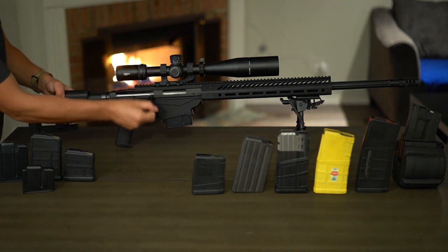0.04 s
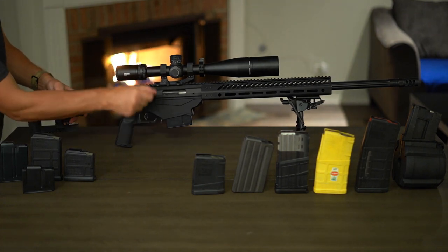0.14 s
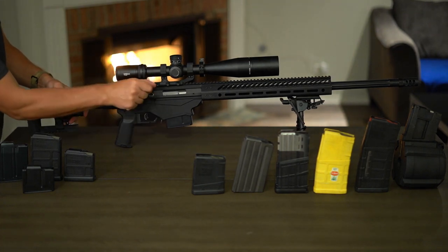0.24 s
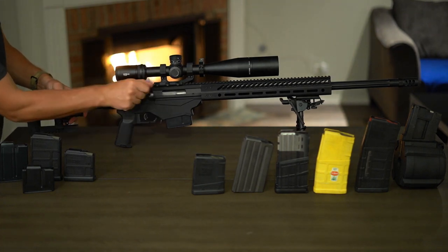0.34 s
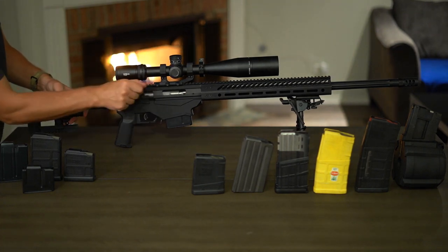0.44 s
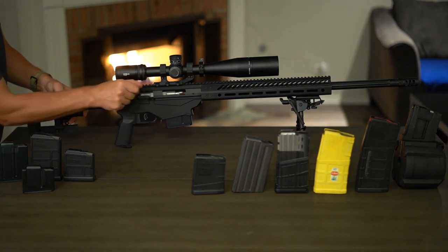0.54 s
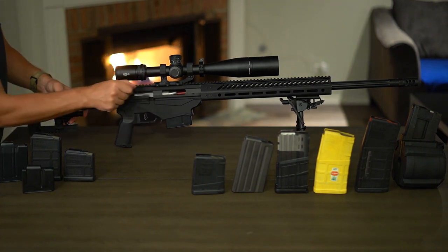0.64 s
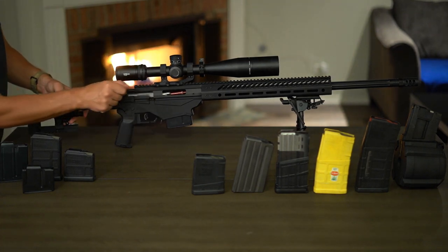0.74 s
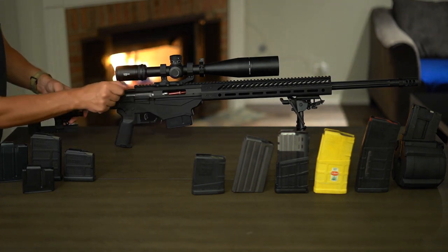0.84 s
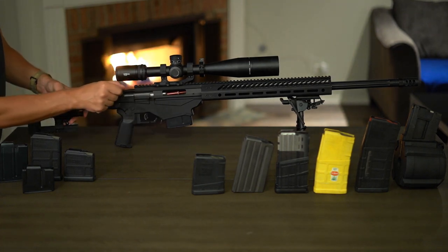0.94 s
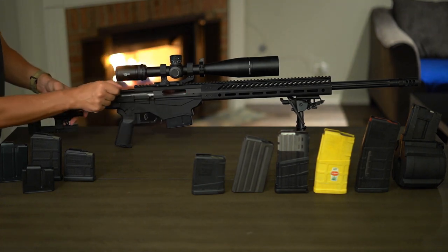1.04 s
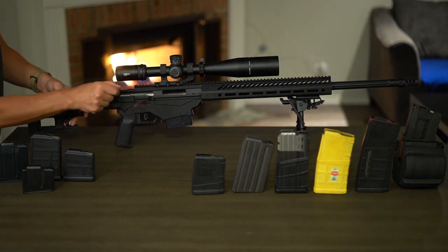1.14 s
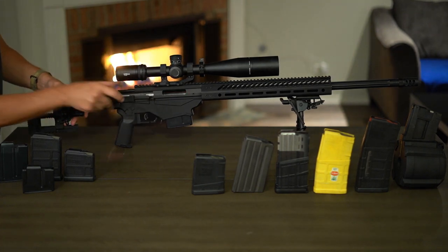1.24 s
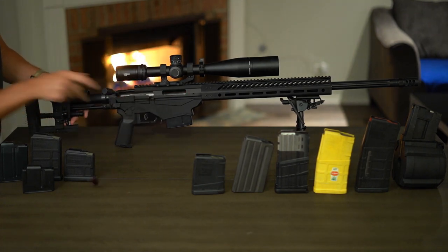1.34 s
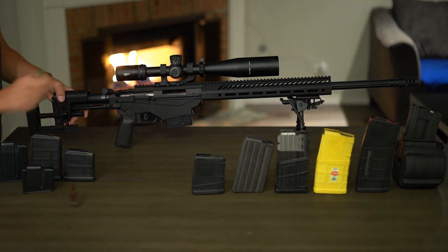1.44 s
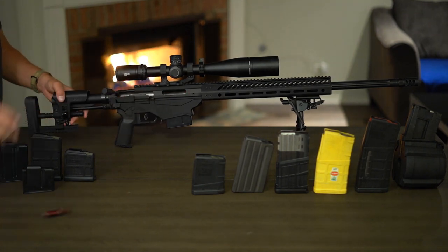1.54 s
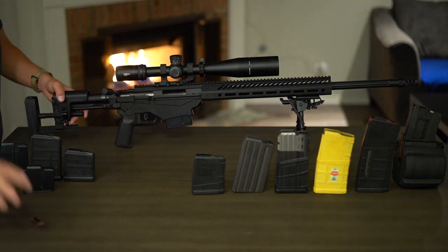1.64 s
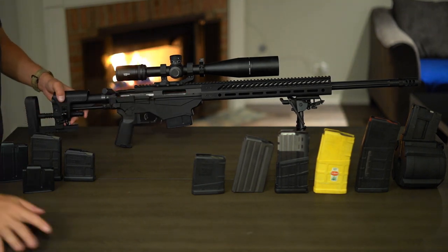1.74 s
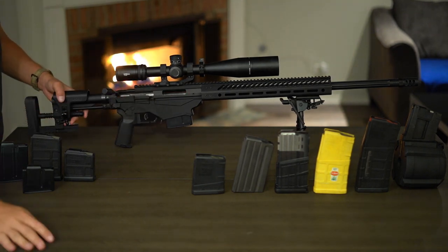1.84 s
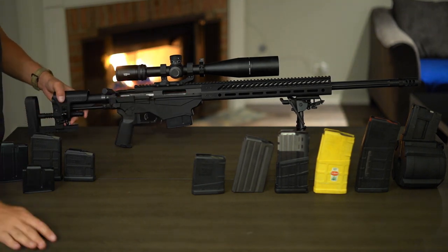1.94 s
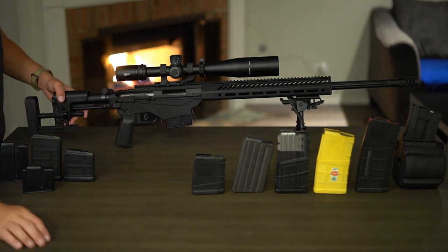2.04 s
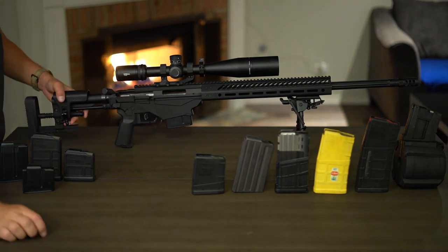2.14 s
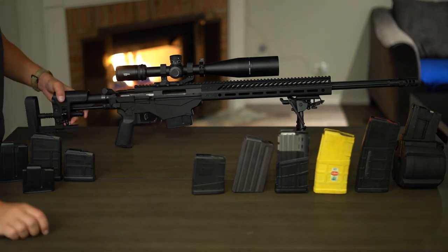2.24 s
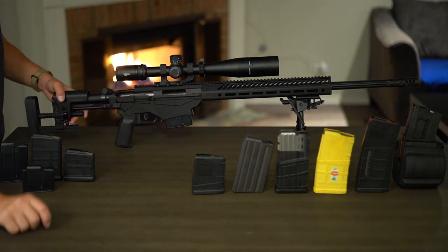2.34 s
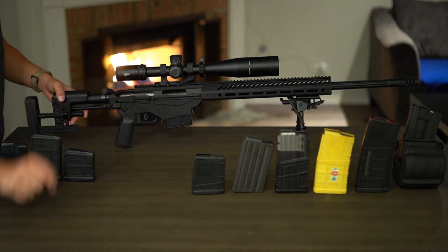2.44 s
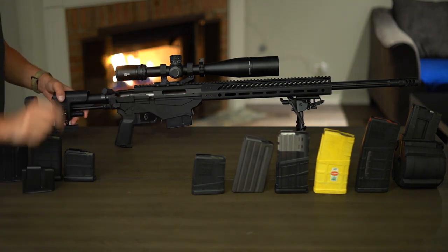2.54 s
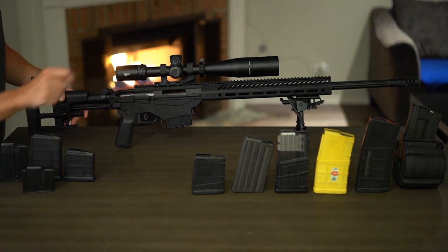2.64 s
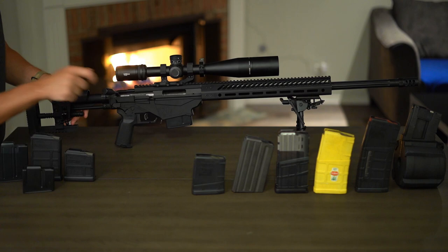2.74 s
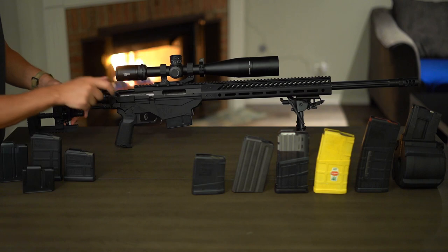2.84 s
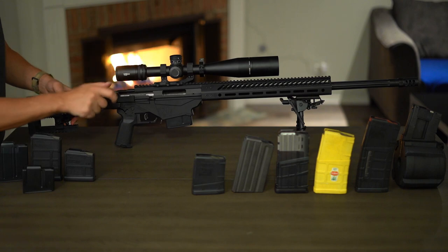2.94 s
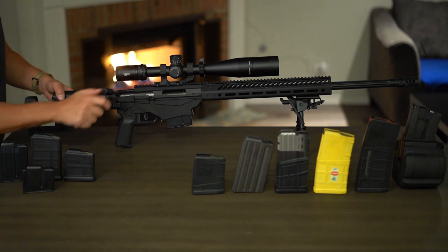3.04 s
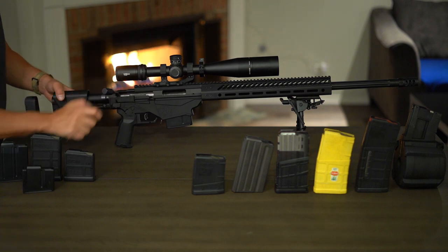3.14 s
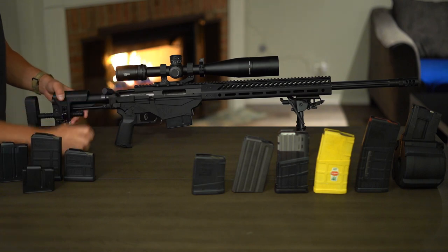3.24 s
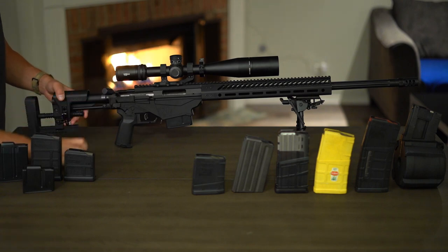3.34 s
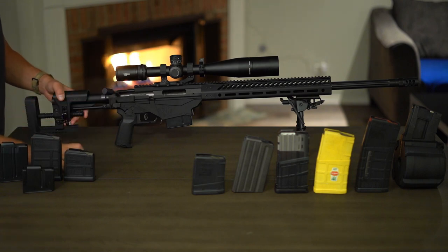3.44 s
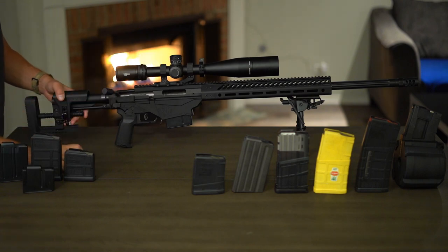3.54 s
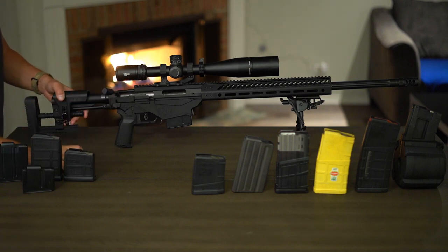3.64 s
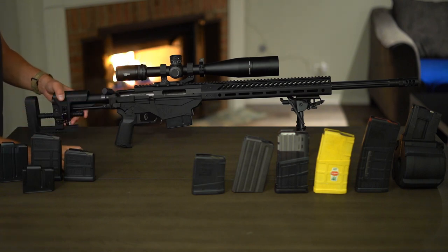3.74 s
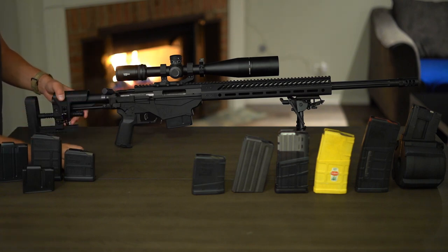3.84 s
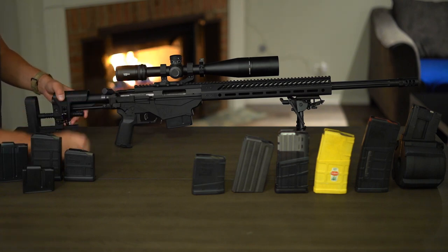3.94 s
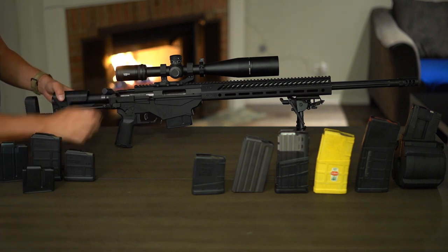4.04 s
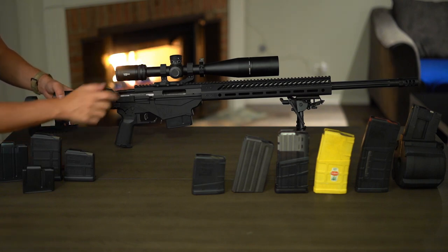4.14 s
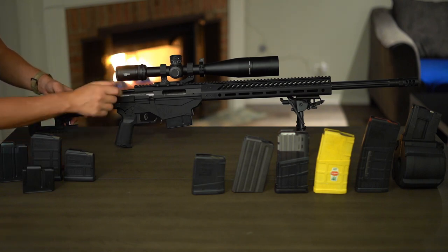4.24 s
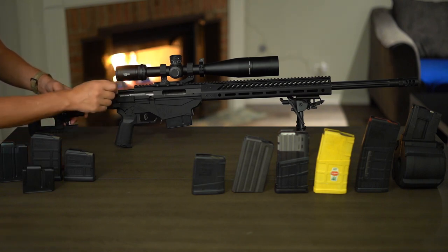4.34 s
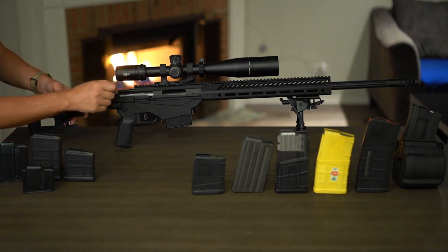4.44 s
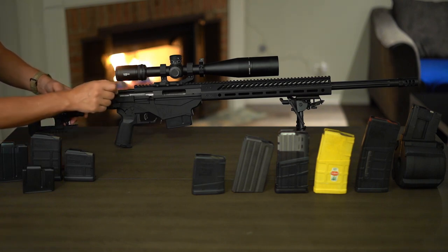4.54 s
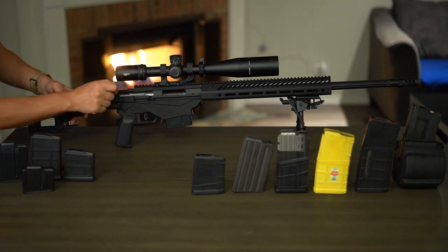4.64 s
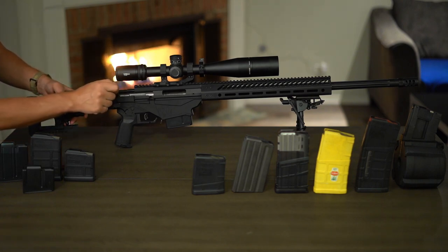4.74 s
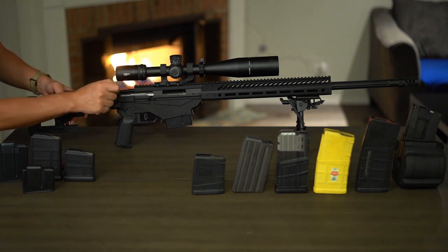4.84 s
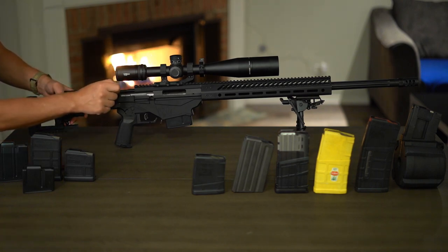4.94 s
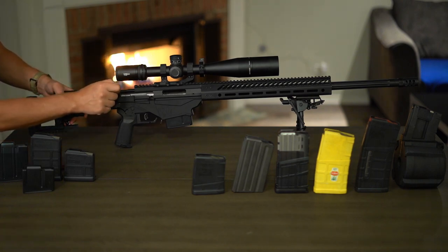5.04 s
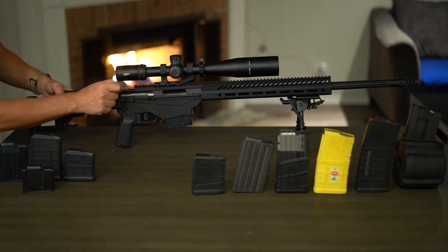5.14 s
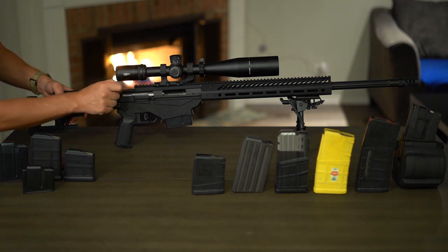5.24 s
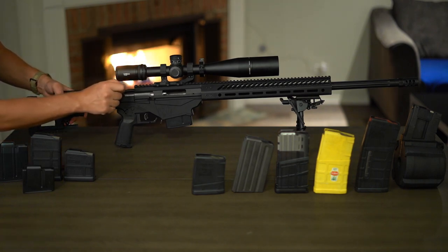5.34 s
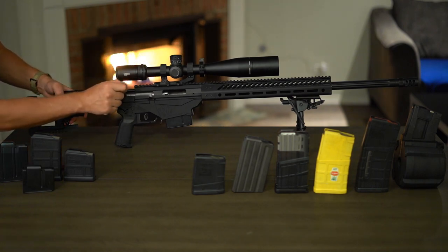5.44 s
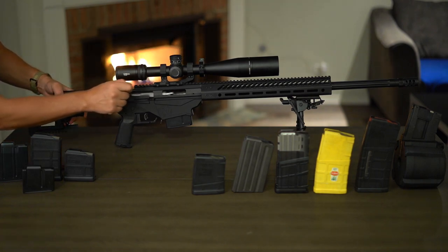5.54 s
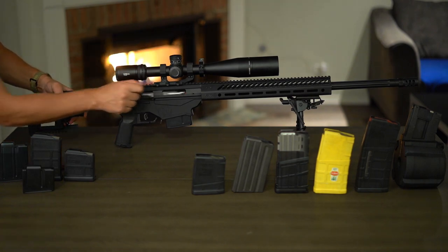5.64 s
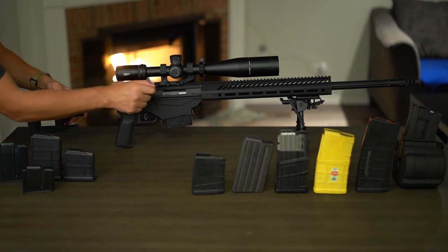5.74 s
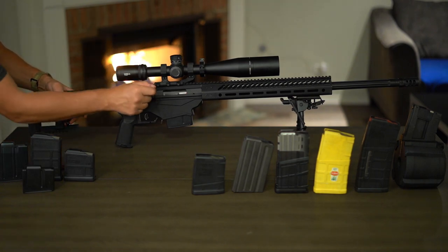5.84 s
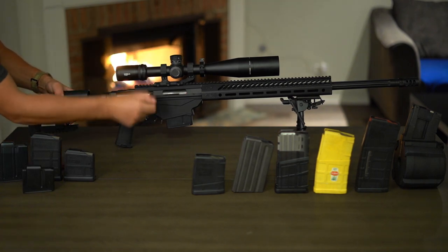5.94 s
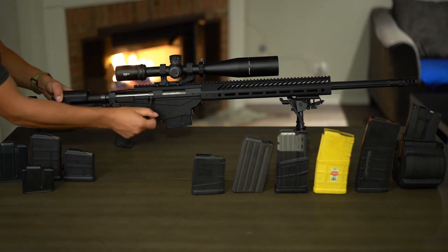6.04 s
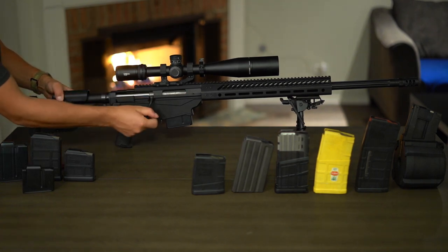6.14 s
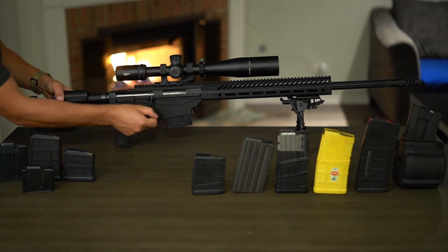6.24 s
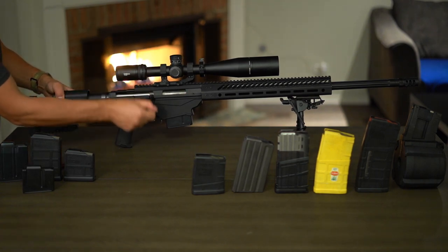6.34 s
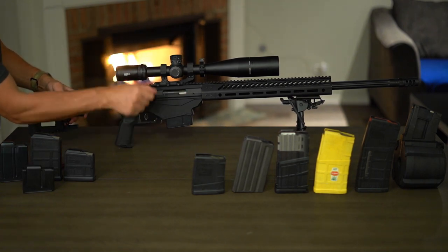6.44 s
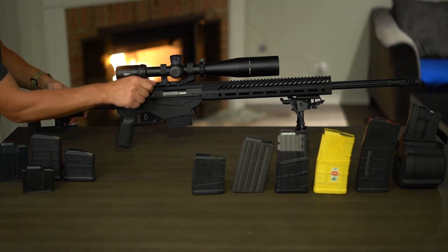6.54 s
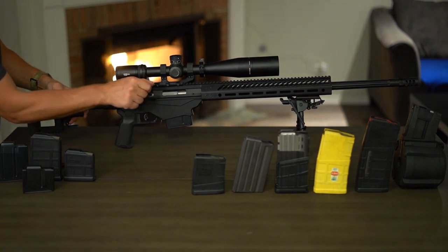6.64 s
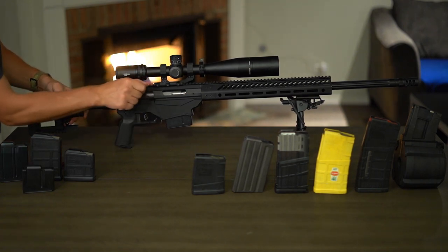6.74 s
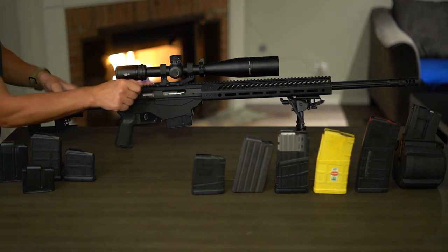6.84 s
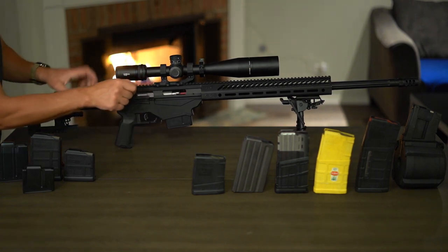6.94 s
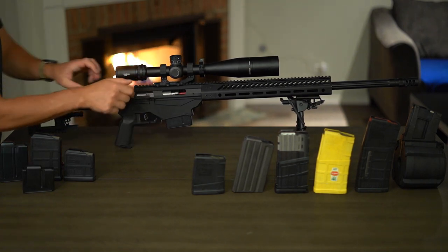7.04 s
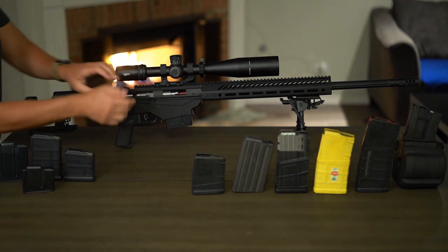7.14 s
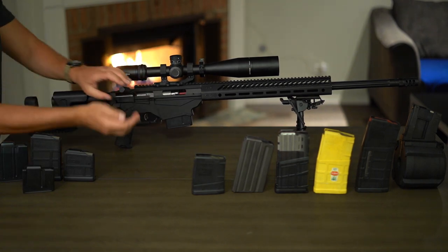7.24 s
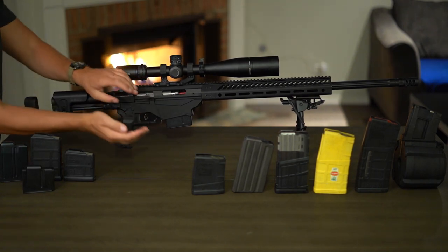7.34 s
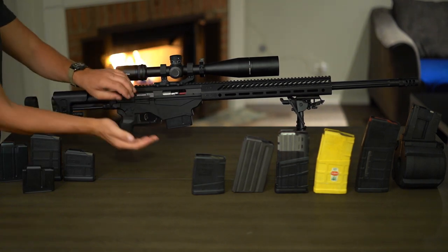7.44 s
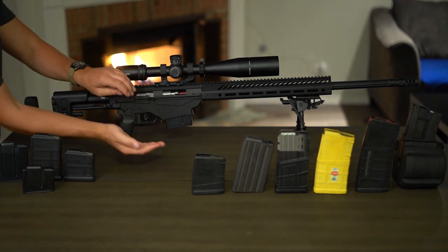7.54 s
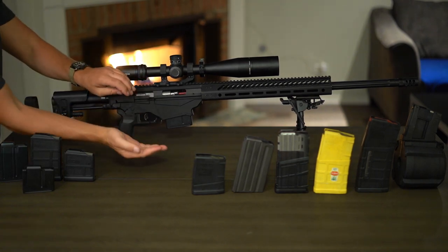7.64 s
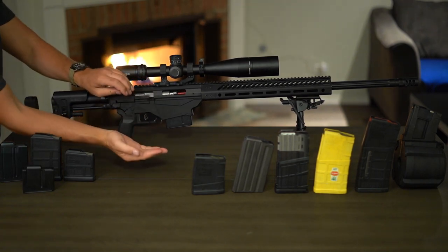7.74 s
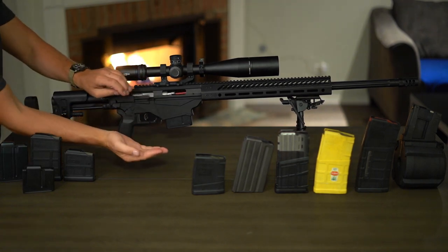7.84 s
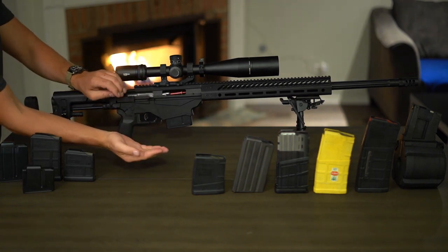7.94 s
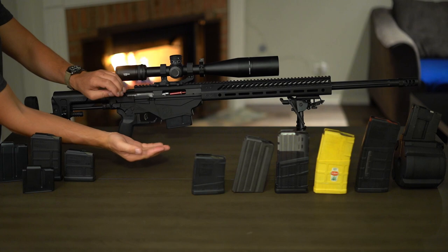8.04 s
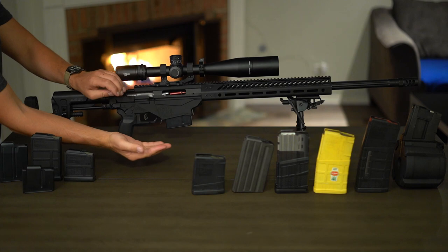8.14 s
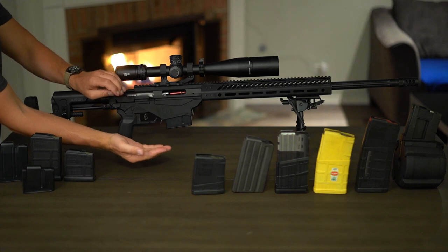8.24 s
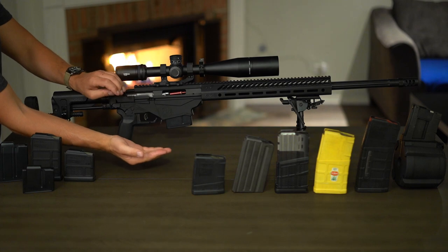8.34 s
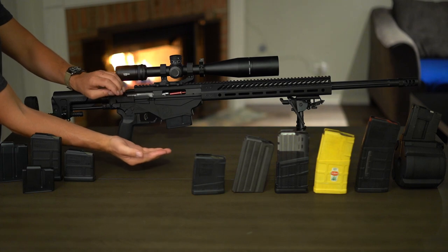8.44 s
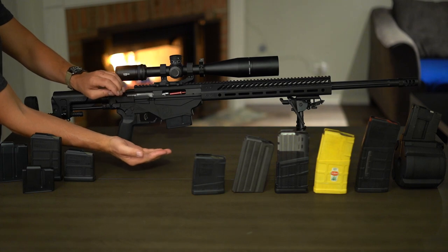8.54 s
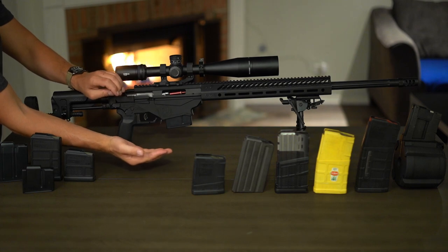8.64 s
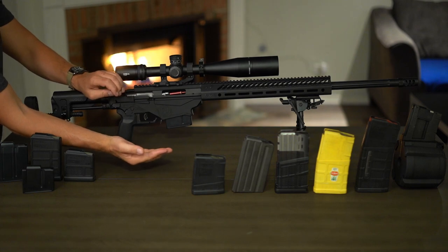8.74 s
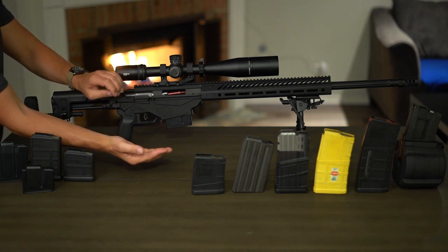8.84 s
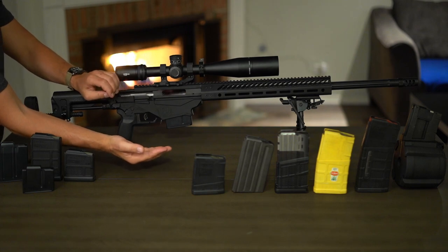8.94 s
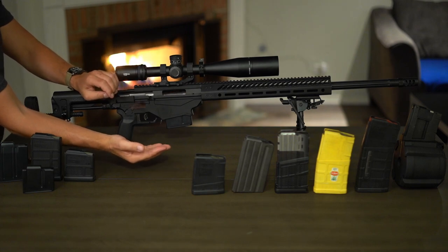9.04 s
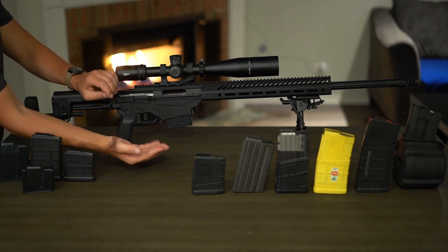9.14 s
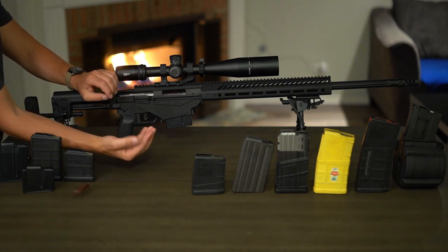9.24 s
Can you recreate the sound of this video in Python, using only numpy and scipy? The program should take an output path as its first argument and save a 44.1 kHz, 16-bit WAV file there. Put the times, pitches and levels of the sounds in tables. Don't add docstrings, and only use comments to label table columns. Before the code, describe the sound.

Close, dry-edged rifle handling in a furnished room with a short echo and steady low rumble. At 0.2 s the bolt clacks twice, then is shoved with a thud and scrapes. A small squeak at 0.65 leads to a sharp clack at 0.75, with more steel knocks at 1.05-1.15. At 1.35 a cartridge smacks the wooden table, bounces and skitters until 1.9 while brass sings near 10 kHz; last taps come at 2.15. Quiet follows, with soft pick-up and set-down taps at 3.5-3.7. A dull thud at 4.37, a click at 4.9. A loud clack at 5.63, a long scrape, and the hardest shove at 6.0. Clacks at 6.45, a wood tap at 6.55, a knock at 6.93, then light ticks. A ringing clack at 7.94; clustered clacks with bright brass around 9.0; a loud table hit at 9.3. The limiter squeezes blows, making the room swell behind.

```python
import sys
import numpy as np
from scipy import signal
from scipy.fft import rfft, irfft, next_fast_len
from scipy.io import wavfile
from scipy.ndimage import uniform_filter1d

SR = 44100
rng = np.random.default_rng(int(sys.argv[2]) if len(sys.argv) > 2 else 0)


def bounce(signal):
    frames = np.transpose(np.atleast_2d(signal))
    limited = np.clip(frames, -1, 1)
    pcm = np.round(limited * 32767).astype(np.int16)
    wavfile.write(sys.argv[1], SR, pcm)


def gain_from_decibels(decibels):
    exponent = np.asarray(decibels, float) / 20
    return 10 ** exponent


N = 410571


def evened(x):
    return x / np.sqrt(np.mean(x ** 2) + 1e-20)


def read(points, hz):
    f, value = np.transpose(points)
    return np.interp(np.log(hz + 1), np.log(f + 1), value)


def add(mix, s, sound):
    part = mix[round(s * SR):][:len(sound)]
    part += sound[:len(part)]


def coloured(x, points):
    size = next_fast_len(len(x))
    gain = gain_from_decibels(read(points, np.fft.rfftfreq(size, 1 / SR)))
    return irfft(rfft(x, size) * gain, size)[:len(x)]


def blow(peak_db, colour, modes, crack_s, ring_db, ring_s):
    t = np.arange(8192) / SR
    crack = evened(coloured(rng.standard_normal(len(t)), colour)) * gain_from_decibels(-60 * t / crack_s)
    hz, mode_db, t60 = np.transpose(modes)[:, :, None]
    luck = rng.random((3, len(modes), 1))
    start_db = read(colour, hz) + 0.445 * mode_db - 12 * luck[0]
    level = gain_from_decibels(start_db - 60 * t / np.minimum(t60, ring_s))
    tuned_hz = hz * (0.985 + 0.028 * luck[1])
    ring = (level * np.sin(2 * np.pi * (tuned_hz * t + luck[2]))).sum(0)
    onset = np.minimum(t / 0.000196, 1)
    return gain_from_decibels(peak_db - 5.5) * (crack + gain_from_decibels(ring_db) * ring) * onset


def blows(rows, modes, thud_db, room_db, rise_s, crack_s, ring_db, ring_s):
    thud_lag = 0.24
    ring_to_room = 0.51
    near, far = np.zeros((2, N))
    for s, peak_db, knock_db, sizzle_db in rows:
        low_db = thud_db - thud_lag * peak_db
        colour = [(150, low_db + 3.0), (550, low_db + 14.0), (1600, knock_db + 11.5), (3800, 0.0094),
                  (9500, sizzle_db - 5), (16000, sizzle_db - 14.5)]
        sound = blow(peak_db, colour, modes, crack_s, ring_db, ring_s)
        t = np.arange(len(sound)) / SR
        add(near, s, sound * np.minimum(t / rise_s, 1))
        click = (np.arange(len(t)) == 200).astype(float)
        snap = evened(coloured(click, colour)) * sound.std()
        add(far, s, (snap + ring_to_room * sound) * gain_from_decibels(room_db))
    return np.array([near, far])


def scrape(strokes, body, per_s, spread_db, split_hz):
    out = np.zeros(N)
    for s, length, start_db, end_db, sizzle_db in strokes:
        u = np.linspace(0, 1, int(length * SR))
        draw = rng.random((3, SR // 2))[:, :len(u)]
        strength = gain_from_decibels(spread_db * np.minimum(-np.log(1 - draw[0]), 3))
        slips = strength * (draw[1] < per_s / SR)
        grains = signal.lfilter([1], [1, -0.96], slips) * (2 * draw[2] - 1)
        whole = evened(coloured(grains, body))
        high_pass = signal.butter(N=2, Wn=split_hz, btype="high", fs=SR, output="sos")
        top = signal.sosfilt(high_pass, whole)
        shaped = whole - top + gain_from_decibels(sizzle_db) * evened(top)
        level = gain_from_decibels(start_db + (end_db - start_db) * u - 2.0)
        add(out, s, level * shaped * signal.windows.tukey(len(u), 0.3))
    return out


def short_tones(rows):
    out, t = np.zeros(N), np.arange(9000) / SR
    for s, db, hz, t60 in rows:
        wobble = evened(uniform_filter1d(rng.standard_normal(len(t)), 150))
        level = gain_from_decibels(db - 60 * t / t60) * np.minimum(t * hz / 13.0, 1)
        add(out, s, level * np.sin(2 * np.pi * hz * t + 0.81 * wobble))
    return out


def bolt_blows():
    # (frequency [Hz], level [dB], time to fade 60 dB [s])
    steel_modes = [(2557, -30.5, 5.0), (2610, -11.5, 0.44), (3241, -16, 5.0), (3980, 21, 0.47),
                   (4296, -3, 1.6), (5141, -13.5, 1.1), (5530, 4, 0.35), (5660, -14, 0.85),
                   (7270, -2.5, 1.6), (8260, -21.5, 1.1), (9100, -3, 0.34), (9970, -9, 0.23),
                   (12780, -27, 1.5), (14300, -23, 0.43)]
    # (time [s], peak [dB], knock [dB], sizzle [dB])
    stops = [(0.1621, 2.5, -18, -19), (0.172, 2, -22, -18), (0.1838, -8.5, -22, -36),
             (0.7539, 1.5, -18.5, -2), (1.0559, -5.5, -15, -24.5), (1.089, -4, -20.5, 0),
             (4.8893, -17.5, -19, -34), (5.5906, -14, -12, -11), (5.6296, 10.5, -22.5, -11.5),
             (5.7883, -6.5, -15, 7.5), (6.4549, 1.5, -16.5, -18), (6.9302, -8, -10, -25),
             (7.9416, 1.5, -16.5, 0.5), (7.9524, -2.5, -32, -16.5), (8.9509, -7, -29, -14),
             (8.9841, -4, -29, -11), (8.9944, -5, -21.5, 8), (9.018, -2, -13.5, -11.5)]
    # (time [s], peak [dB], knock [dB], sizzle [dB])
    shoves = [
        (0.2534, 2, -11, -10),
        (1.1401, -0.5, -9.5, -8.5),
        (4.3704, -1, -17, -20),
        (5.9997, 10.5, -17.5, -12.5),
        (6.075, -12.5, -2, -33.5),
        (6.4652, -6.5, -26, -22),
    ]
    # (time [s], peak [dB], knock [dB], sizzle [dB])
    touches = [(0.0836, -22.5, -10, -25), (0.4484, -16, 0, 4), (0.6066, -17, -38, -9.5),
               (1.0824, -23, -22, -19), (4.3395, -23, -5, -20), (5.1123, -20.5, -5, -39),
               (5.405, -26, -10, -30), (5.5143, -21, -6, -16), (5.986, -2.5, -10, -21),
               (6.3313, -21, -14, -35), (6.4375, -23, -7, -26), (6.7541, -15.5, -11.5, -7.5),
               (6.8089, -15, -11, -25.5), (6.946, -12, -33, -12), (7.0653, -18, -6, -27.5),
               (7.49, -16, -7, -39), (7.635, -10.5, -3, -30), (7.7872, -18, -6, -28),
               (7.884, -25.5, -7, -26.5), (8.4906, -24.5, -12, -21), (8.8976, -23, -11, -24)]
    steel = dict(crack_s=0.028, ring_db=-28, ring_s=0.06)
    return (blows(stops, steel_modes, thud_db=-25, room_db=-1, rise_s=0.0005, **steel)
            + blows(shoves, steel_modes, thud_db=-14, room_db=-3, rise_s=0.0005, **steel)
            + blows(touches, steel_modes, thud_db=-11, room_db=-2, rise_s=0.0017, **steel))


def bolt_slides():
    # (start [s], length [s], start level [dB], end level [dB], sizzle [dB])
    bolt_strokes = [(0.17, 0.11, -20, -35.5, -10), (0.26, 0.26, -29.5, -35, -5),
                    (0.6, 0.27, -35.5, -28.5, -22), (5.385, 0.048, -31.5, -40, -9),
                    (5.5, 0.125, -40.5, -18.5, -7), (5.63, 0.21, -18, -13, -0.5),
                    (6.005, 0.105, -17, -10.5, -7.5), (6.46, 0.1, -8.5, -36.5, -5.5),
                    (7.86, 0.11, -40.5, -32, -10), (8.9, 0.029, -40, -31, -18),
                    (8.95, 0.08, -8, -40.5, -19)]
    # (frequency [Hz], level [dB per Hz])
    rails = [(150, -38), (250, -6), (436, -1), (639, -15), (747, -9), (1470, -8.5), (3330, 2.5),
             (8660, -24), (10500, -27.5), (11200, -30.5), (15900, -45)]
    return scrape(bolt_strokes, rails, per_s=1500, spread_db=4.5, split_hz=7700)


def handle_squeaks():
    # (time [s], level [dB], frequency [Hz], time to fade 60 dB [s])
    handle_tones = [
        (0.643, -13.5, 1250, 0.055),
        (.65, -34.5, 3600, .04),
        (0.679, -21, 2750, 0.045),
        (0.729, -28, 2700, 0.099),
    ]
    return short_tones(handle_tones)


def pings():
    # (time [s], level [dB], frequency [Hz], time to fade 60 dB [s])
    ping_tones = [(0.161, -8.5, 3400, 0.061), (.756, -17, 3400, 0.13), (1.862, -18, 10000, .03),
                  (2.18, -15, 9900, 0.023), (3.51, -16, 1977, .04), (4.339, -26, 2800, .03),
                  (4.372, -12, 2880, 0.032), (4.372, -13.5, 4030, .05), (4.89, -15.5, 3307, .03),
                  (5.405, -27, 2670, 0.071), (7.943, -12, 4240, 0.22), (7.945, -18.5, 5510, .25),
                  (8.951, -17.5, 4500, .06), (8.985, -4, 3200, 0.028), (9.031, -18, 2708, .15)]
    return short_tones(ping_tones)


def brass():
    # (frequency [Hz], split between its two tones [Hz])
    brass_cases = [
        (9975, 68),
        (10208, 44),
    ]
    # (start [s], damped after [s], level [dB], fade [dB per s], which case [index])
    songs = [
        (1.089, 0.05, -13.5, 60.5, 0),
        (1.14, 0.2, -20, 46.5, 0),
        (1.35, 0.093, -8, 298, 0),
        (1.418, 0.16, -13, 83, 0),
        (1.6, 0.47, -23.5, 71, 0),
        (3.664, 0.2, -47, 168, 0),
        (5.638, 0.12, -18, 130, 1),
        (8.9944, 0.024, -6, 95, 1),
        (9.018, 0.25, -14.5, 89, 1),
    ]
    out = np.zeros(N)
    for s, length, level_db, fade_db, case in songs:
        hz, split_hz = brass_cases[round(case)]
        t = np.arange(0, length, 1 / SR)
        drift = uniform_filter1d(rng.standard_normal((2, SR // 2)), 700)
        tumble = evened(uniform_filter1d(drift, 700))[:, :len(t)]
        phase = 2 * np.pi * np.outer([hz, hz + split_hz], t) + 0.89 * tumble[::-1]
        tones = np.sin(phase) * gain_from_decibels(2.9 * tumble)
        pair = evened(tones[0] + gain_from_decibels(-6.5) * tones[1])
        shape = np.minimum(t / 0.002, 1) * signal.windows.tukey(len(t), 0.04)
        add(out, s, gain_from_decibels(level_db + 2.0 - fade_db * t) * pair * shape)
    return out


def table_blows():
    # (frequency [Hz], level [dB], time to fade 60 dB [s])
    wood_modes = [(691, 6, 0.47), (1203, -13.5, 0.43), (1353, 3.5, 5.0), (1520, 11.5, 0.47),
                  (1560, 8.5, 0.42), (2090, 14, 0.61), (2404, -33, 0.42), (2562, -29, 5.0), (2720, -2, 1.2),
                  (2980, -24, 1.1), (3400, 18, 0.12), (3495, 7.5, 0.69), (4920, -39, 1.2),
                  (10000, -16, 0.37)]
    # (time [s], peak [dB], knock [dB], sizzle [dB])
    bounces = [(1.3409, -0.5, -27, -38), (1.344, 0.5, -11.5, -23.5), (1.3487, 17.5, -1.5, -11),
               (1.4519, -24, -6.5, -24.5), (1.4991, 1.5, -10.5, -27.5), (1.5657, 2, -8.5, -47),
               (1.5918, 0, -12, -23.5), (1.609, -6.5, -1.5, -5.5), (1.6324, -2.5, -10, -26),
               (1.689, 6.5, -5.5, -33.5), (1.7464, 5.5, -9, -49.5), (1.7842, -8.5, 5, -37.5),
               (1.8365, -10.5, -21, -26), (1.8492, -4, 4.5, -26.5), (1.8643, -9, -5.5, -11),
               (2.1281, 0.5, -7.5, -16.5), (2.14, -13, -21, -28), (2.1757, -5.5, -7.5, -27),
               (2.1822, -10, 12.5, -7), (6.556, 1, -20.5, -11), (9.2939, 16, -8, -17.5),
               (9.3034, -4.5, -25, -20)]
    # (time [s], peak [dB], knock [dB], sizzle [dB])
    handling = [
        (2.819, -35, -17, -24),
        (3.5103, -15.5, -1.5, -20),
        (3.6604, -5, -2, -27.5),
        (3.6686, -2.5, -1.5, -68),
        (3.8275, -25.5, 5, -34),
        (4.0804, -32, -7, -20.5),
    ]
    wood = dict(crack_s=0.04, ring_db=-15, ring_s=0.087)
    return (blows(bounces, wood_modes, thud_db=-18.5, room_db=-1, rise_s=0.001, **wood)
            + blows(handling, wood_modes, thud_db=-9, room_db=-1, rise_s=0.0017, **wood))


def table_skitter():
    # (start [s], length [s], start level [dB], end level [dB], sizzle [dB])
    skitter_runs = [
        (1.355, 0.335, -9, -16.5, -50),
        (1.685, 0.195, -19.5, -12.5, -16),
    ]
    # (frequency [Hz], level [dB per Hz])
    board = [(150, -47), (250, -19.5), (407, 4), (484, 0), (773, -0.5), (1260, 6), (2160, -3.5), (3570, 5),
             (8810, -49), (9770, -28.5), (10300, -25), (10800, -30), (15900, -53)]
    return scrape(skitter_runs, board, per_s=1500, spread_db=6.0, split_hz=6400)


def thumps():
    # (time [s], level [dB], frequency [Hz], time to fade 60 dB [s])
    thump_tones = [(.262, -7, 428, .1), (1.79, -21.5, 1500, 0.19), (1.852, -19, 1515, .3),
                   (2.178, -22.5, 1470, .25), (2.14, -15, 423, .15), (4.371, -5.5, 438, 0.13),
                   (4.371, -9, 747, 0.079), (5.63, -14, 2700, 0.32), (5.632, -11, 3450, 0.28),
                   (6.557, -13, 1548, .45), (8.952, -7.5, 2620, 0.057), (9.019, 2, 2394, 0.033)]
    return short_tones(thump_tones)


def room(x):
    # (frequency [Hz], time to fade 60 dB [s])
    echo_fade = [(250, 0.6), (660, 0.79), (1740, 0.58), (4590, 0.62), (12100, 0.42)]
    taps = np.zeros(SR)
    at = np.arange(260, SR - 20, 20)
    taps[at + rng.integers(0, 20, len(at))] = rng.choice([-1., 1.], len(at))
    hz, t, z = signal.stft(taps, SR, nperseg=256)
    fade = gain_from_decibels(-60 * t / read(echo_fade, hz)[:, None])
    tail = signal.istft(z * fade, SR, nperseg=256)[1]
    return signal.fftconvolve(x, tail / np.linalg.norm(tail))[:N]


def air():
    # (frequency [Hz], level [dB per Hz])
    air_colour = [(15, -68.5), (25, -49.5), (47, -12), (99, -1), (133, -8), (235, -13), (269, -14.5),
                  (334, -14), (383, -19), (488, -16), (558, -23), (1520, -27.5), (1640, -33), (3700, -37),
                  (15900, -64.5)]
    frames = N // 256 + 5
    a, b, patches = rng.standard_normal((frames, 513, 3)).T
    patches = evened(uniform_filter1d(uniform_filter1d(patches, 10, 0), 12, 1))
    spectra = (a + 1j * b) * gain_from_decibels(1.6 * patches)
    hiss = signal.istft(spectra, nperseg=1024, noverlap=768)[1][:N]
    return gain_from_decibels(-32) * evened(coloured(hiss, air_colour))


def scene():
    near, far = bolt_blows() + table_blows()
    rub = bolt_slides() + table_skitter()
    ring = brass() + handle_squeaks() + thumps() + pings()
    wet = room(gain_from_decibels(-2.0) * far + gain_from_decibels(-3.0) * rub + gain_from_decibels(-11.5) * ring)
    return (near + rub + ring + wet + air())[None]


def excess(x, size, recovery_db, ceiling_db):
    power_db = 10 * np.log10(abs(uniform_filter1d(x ** 2, size)) + 1e-12)
    fall = np.arange(N) * recovery_db / SR
    held_db = np.maximum.accumulate(power_db + fall) - fall
    return np.maximum(held_db - ceiling_db, 0)


def roll_off(x):
    return signal.sosfilt(signal.butter(12, 16050, fs=SR, output="sos"), x)


def record(dry):
    quick_db = 0.65 * uniform_filter1d(excess(dry[0], size=200, recovery_db=109.5, ceiling_db=-8), 90)
    held = signal.lfilter([1 / 9000], [1, 1 / 9000 - 1], dry[0] ** 2) ** 0.5
    slow_db = 0.47 * excess(held, size=400, recovery_db=25.0, ceiling_db=-11.5)
    limited = dry / gain_from_decibels(quick_db + slow_db)
    return roll_off(np.clip(limited, -1, 1))


dry = scene()
out = record(dry)
bounce(out)
```